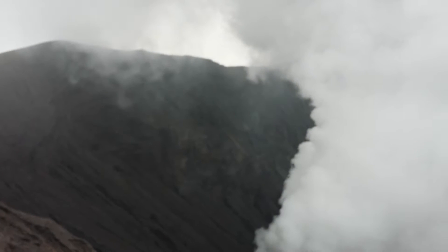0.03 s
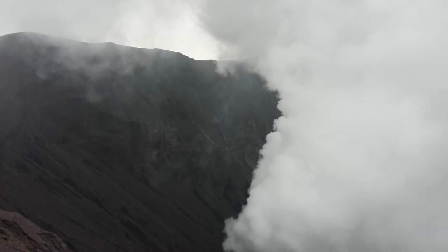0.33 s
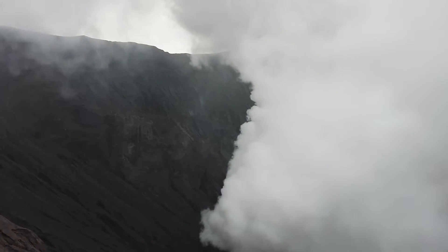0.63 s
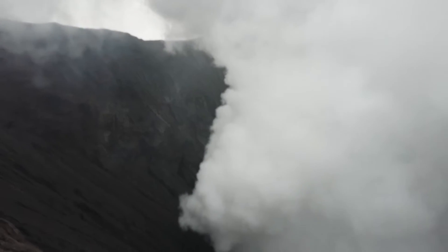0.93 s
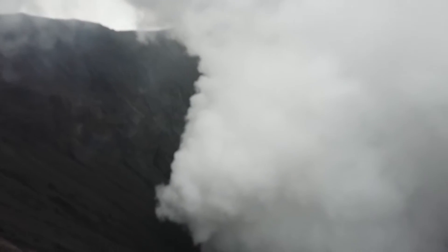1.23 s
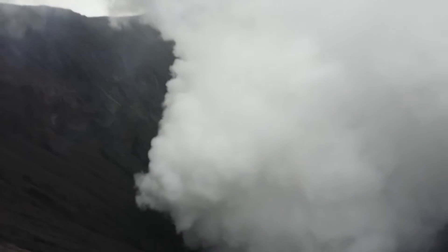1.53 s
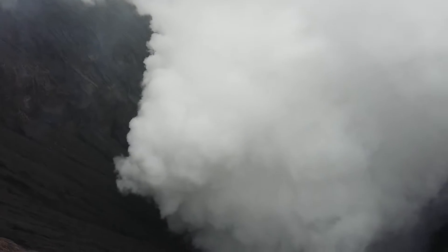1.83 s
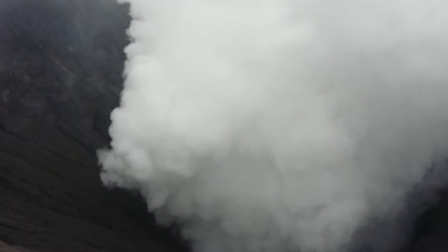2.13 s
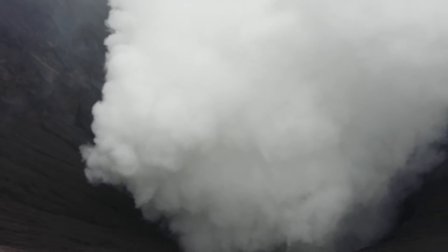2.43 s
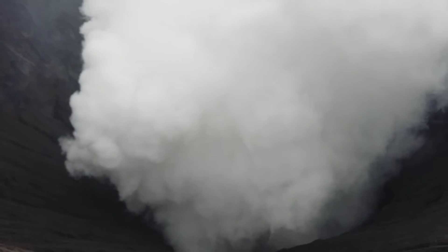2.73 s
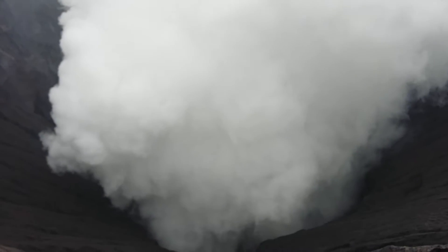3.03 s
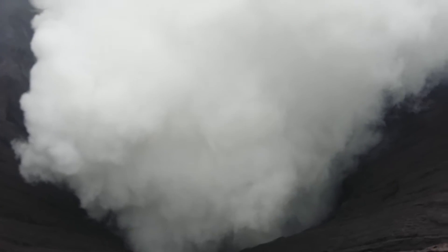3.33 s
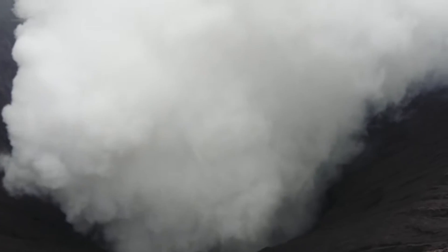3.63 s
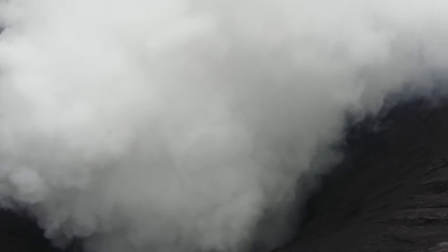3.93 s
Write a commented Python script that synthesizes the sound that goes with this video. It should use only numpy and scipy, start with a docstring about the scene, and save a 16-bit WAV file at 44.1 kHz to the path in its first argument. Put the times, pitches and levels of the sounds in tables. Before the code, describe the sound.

A volcanic vent pours out steam in a steady, low roar topped by a soft hiss. The sound drifts from slightly right to centre and gives two small spurts past the middle, while a faint breeze touches the microphone.

```python
"""On the rim of a volcanic crater, above a vent that pours out steam and gas without pause.
Large eddies rumble and roar, smaller ones rush and hiss, and the jet spurts twice; the crater walls
scatter the treble. The vent's hollow and its narrow throat resonate, wandering in pitch.
The microphone pair stands in a light breeze and turns slowly toward the vent, which brings the
sound from the right to the centre and shifts its colour."""
import sys
import numpy as np
from scipy import signal
from scipy.fft import rfft, irfft
from scipy.io import wavfile
from scipy.ndimage import map_coordinates

SR = 44100
rng = np.random.default_rng(int(sys.argv[2]) if len(sys.argv) > 2 else 0)


def generate_wav(sig):
    """Save sig (samples, or channels by samples) to the path in sys.argv[1] as 16-bit PCM at SR."""
    pcm = np.round(np.clip(np.atleast_2d(sig).T, -1, 1) * 32767).astype(np.int16)
    wavfile.write(sys.argv[1], SR, pcm)


N = 176400
TIME = np.arange(N) / SR
BIN_HZ = np.maximum(np.arange(N // 2 + 1) * SR / N, 1)
SIDES = np.array([[1], [-1]])  # left, right


def from_db(db):
    """Decibels to gain."""
    return 10 ** (np.asarray(db) / 20)


def in_time(rows):
    """A (time, value) curve at every sample."""
    return np.interp(TIME, *np.transpose(rows))


def by_hz(rows, octaves=0):
    """A (frequency, value) curve at every bin, on a log axis, slid up by some octaves."""
    hz, value = np.transpose(rows)
    return np.interp(np.log2(BIN_HZ) - octaves, np.log2(hz), value)


def bell(hz, octaves):
    """Bell-shaped gain around a frequency."""
    return np.exp(-.5 * (np.log2(BIN_HZ / hz) / octaves) ** 2)


def rms_one(x):
    """Scale to unit rms."""
    return x / np.sqrt(np.mean(x ** 2) + 1e-20)


def white():
    """Spectrum of white noise at 0 dB per Hz."""
    return rfft(rng.standard_normal(N)) * np.sqrt(SR / 2)


def drift(rate_hz):
    """Slow random wander of unit rms."""
    return rms_one(irfft(white() / (1 + (BIN_HZ / rate_hz) ** 2), N))


def jet():
    """Eddies from large to small: each size swells and flutters by itself, and all billow together."""
    # base spectrum of the jet at the rim: (frequency [Hz], level [dB per Hz])
    jet_spectrum = [(20, -79), (31, -77), (40, -68), (49, -59.5), (64, -50), (85, -49), (125, -41.5),
                    (160, -43), (182, -45), (215, -44), (278, -45.5), (345, -52), (385, -50), (450, -53.5),
                    (500, -60.5), (600, -57), (800, -60.5), (1000, -58.5), (1220, -58), (1500, -57),
                    (1850, -59.5), (2120, -60), (2500, -64), (3000, -68), (3500, -66.5), (3980, -68.5),
                    (4400, -77), (5000, -88.5), (6000, -98.5), (7000, -108), (8000, -124), (11000, -150)]
    # slow swell of each band, low to high: (time [s], gain [dB])
    rumble = [(0, 1.5), (.3, 0.6), (.8, 1), (1.15, -0.3), (1.401, -0.4), (1.68, -1.5), (1.79, 4.5),
              (1.92, -2.3), (2.4, -1), (2.8, -0.5), (3.2, 0.3), (4, -1)]
    roar = [(0, -1.5), (.35, -0.5), (.7, -4), (.92, -2), (1.449, 0.6), (1.899, 1), (2.3, 1.2), (2.6, 2),
            (2.9, 2.5), (3.1, 0), (4, 0)]
    drone = [(0, -1.5), (.3, 4), (.55, -1), (.85, 3), (1.3, 0), (1.8, -1), (2.199, 0.5), (2.8, -1),
             (3.25, -4.5), (3.6, -0.5), (4, -2.5)]
    low_rush = [(0, 3.5), (.5, 2), (.9, 0.7), (1.2, 4.5), (1.38, -1.5), (1.65, 4), (2, 2.2), (2.4, 0.9),
                (2.7, -1.4), (3.1, -0.5), (4, -3.8)]
    high_rush = [(0, 0.72), (.4, -0.68), (1.4, 0.11), (1.7, 1), (2.1, 0.48), (2.3, -0.58), (2.65, -0.39),
                 (2.9, -0.93), (3.05, -0.88), (4, -1.8)]
    sizzle = [(0, 1.3), (.4, 0.9), (.8, 1.5), (1.4, -0.5), (1.8, 1.6), (2.2, 0), (2.55, 0.8), (2.85, -0.1),
              (3.05, -2), (3.5, -1.5), (4, -3)]
    hiss = [(0, -5.5), (1, -1.4), (1.75, 1.6), (2.2, 1.9), (2.9, 1), (3.25, 2), (3.6, 1.1), (4, 1)]
    top_hiss = [(0, 8), (0.799, 4.5), (1.599, 4), (2.2, 0), (3.2, 0.5), (4, -1.5)]
    # where neighbouring bands meet: (frequency [Hz])
    crossovers = [185, 490, 690, 1020, 1700, 2900, 4450]
    # restlessness of each band: (level spread [dB])
    flutters = [1, 0.53, 0.47, 0.98, 1, .5, 0.35, .4]
    swells = (rumble, roar, drone, low_rush, high_rush, sizzle, hiss, top_hiss)
    lowpasses = [1 / (1 + (BIN_HZ / hz) ** 16) for hz in crossovers] + [1]
    remaining = turbulence() * from_db(by_hz(jet_spectrum))
    billow_db = 0.56 * drift(rate_hz=4)
    out = 0
    for lowpass, swell, flutter_db in zip(lowpasses, swells, flutters):
        band = irfft(remaining * lowpass, N)
        gain_db = in_time(swell) + billow_db + flutter_db * drift(rate_hz=12)
        out = out + band * from_db(gain_db)
        remaining = remaining * (1 - lowpass)
    return out


def turbulence():
    """Stereo noise spectrum: direct sound is common to both microphones, wall scatter differs."""
    # sound reaching the rim straight from the vent: (frequency [Hz], share [0-1])
    direct_share = [(40, 0.8), (85, 1), (170, 0.98), (300, 0.98), (410, 0.97), (490, .85), (590, .95),
                    (850, 0.81), (1250, .93), (1480, 0.8), (1720, .66), (2100, .82), (2700, .61),
                    (3350, .68), (4200, 0.2), (6000, 0)]
    direct = np.clip(by_hz(direct_share), 0, .999)
    mid = np.sqrt((1 + direct) / 2) * white()
    side = np.sqrt((1 - direct) / 2) * white()
    return mid + SIDES * side


def spurts():
    """Short rounded surges of gas that brighten the rush."""
    # the two surges: (time [s], length [s], level at the crest [dB])
    surges = [(2.523, 0.08, -25.5), (2.79, 0.17, -27.5)]
    swell = sum(from_db(db) * np.exp(-2 * ((TIME - at) / length) ** 2) for at, length, db in surges)
    return swell * rms_one(irfft(turbulence() * bell(hz=1370, octaves=0.35), N))


def resonance(rows, width_hz):
    """A cavity blown by the jet: a narrow band of noise whose centre wanders."""
    times, centre_hz, level_db = np.transpose(rows)
    phase = 2 * np.pi * np.cumsum(np.interp(TIME, times, centre_hz)) / SR
    lowpass = 1 / np.sqrt(1 + (2 * BIN_HZ / width_hz) ** 4)
    in_phase, quadrature = (irfft(white() * lowpass, N) for _ in range(2))
    band = rms_one(in_phase * np.cos(phase) + quadrature * np.sin(phase))
    return from_db(np.interp(TIME, times, level_db)) * band


def vent_resonances():
    """The vent's hollow booms, its narrow throat rings, and a breathy resonance sits above them."""
    # path of each resonance: (time [s], centre [Hz], level [dB])
    hollow = [(0, 140, -22.5), (.25, 165, -27.5), (.55, 170, -28), (.72, 195.1, -29), (.96, 195, -21),
              (1.3, 205, -28), (1.6, 220, -33), (2.0, 218, -25.5), (2.3, 216, -20.5), (2.55, 218, -23.5),
              (2.8, 256, -25), (3.05, 240, -34.5), (3.5, 225, -31.5), (4, 205, -29)]
    throat = [(0, 1192, -39.5), (.8, 1202, -33.5), (1.3, 1214, -34.5), (1.55, 1096, -32.5),
              (1.8, 1177, -33), (2.2, 1170, -34.5), (2.55, 1265, -39), (2.8, 1290, -33),
              (3.05, 1237, -39.5), (4, 1224, -40.5)]
    shrill = [(0, 2345, -54), (.62, 2400, -43.5), (1.2, 2349, -42.5), (1.9, 2257, -43.5), (2.4, 2168, -43),
              (2.85, 2105, -41.5), (4, 2154, -43.5)]
    return (resonance(hollow, width_hz=60) + resonance(throat, width_hz=170)
            + resonance(shrill, width_hz=310))


def microphone_ports(sound):
    """Each port colours the sound; the colour slides and changes depth as the pair turns."""
    # base colour of the ports: (frequency [Hz], left minus right [dB])
    balance = [(50, -0.5), (150, -0.6), (290, -1), (470, 0.5), (540, -1.5), (650, -3.5), (770, -4.5),
               (1000, -2.5), (1350, -1), (1740, 5), (2070, -2.5), (2450, 3.5), (2780, 8), (3150, -2.5),
               (3550, -8), (4150, -10), (4700, -2.5), (5200, 5), (6500, 2), (8000, 8.5)]
    # phase between the ports: (frequency [Hz], left lead [rad])
    port_phase = [(100, 0), (250, .1), (380, .1), (540, -0.46), (720, 0.094), (1000, 0.46), (1550, 0.32),
                  (1920, -0.91), (2300, 0.64), (2650, -0.39), (3100, -1.64), (3800, -1)]
    # the colour through the turn: (time [s], slide [octaves], depth [factor])
    turn = [(0, -0.072, 0.74), (1, -0.056, 0.84), (2, 0.026, 1.18), (3, 0.047, 1.05), (4, .13, 0.9)]
    times = [row[0] for row in turn]
    spectrum, out = rfft(sound), 0
    for (_, octaves, depth), crossfade in zip(turn, np.eye(len(turn))):
        slide = octaves / (1 + (BIN_HZ / 1800) ** 8)  # the treble's colour stays in place
        gain = from_db(SIDES * depth * by_hz(balance, slide) / 2)
        gain /= np.sqrt(np.mean(gain ** 2, axis=0))  # the pair's total power holds steady
        colour = gain * np.exp(.5j * SIDES * by_hz(port_phase, slide))
        out = out + np.interp(TIME, times, crossfade) * irfft(spectrum * colour, N)
    return out


def arrival_lag(sound):
    """The vent reaches the left microphone late; the gap closes as the pair turns to face it."""
    # left microphone behind the right: (time [s], lag [ms])
    left_lag = [(0, 0.21), (.7, 0.16), (1.2, 0.13), (1.7, 0.085), (2.3, 0.068), (3, 0.03), (4, -0.026)]
    left, right = sound
    lag_samples = in_time(left_lag) * SR / 1000
    late_left = map_coordinates(left, [np.arange(N) - lag_samples], order=5, mode="mirror")
    return np.array([late_left, right])


def breeze():
    """Lumpy low buffeting right on the microphones, different at each port."""
    # slow trend of the buffeting: (time [s], level [dB])
    trend = [(0, -40), (.6, -44), (.9, -47), (1.7, -46.5), (2.15, -41), (2.6, -45), (3.3, -39), (4, -30.5)]
    colour, gust_db = bell(hz=73, octaves=.34), 1.4
    channels = []
    for _ in range(2):
        buffet = rms_one(irfft(white() * colour, N))
        channels.append(buffet * from_db(in_time(trend) + gust_db * drift(rate_hz=4)))
    return np.array(channels)


def scene():
    """The vent from the rim, moving from right to centre as the pair turns in a light breeze."""
    vent = vent_resonances() + jet() + spurts()
    return arrival_lag(microphone_ports(vent)) + breeze()


def record(dry):
    """The ends are eased, faint microphone hiss is added and the top is cut."""
    fade_s, hiss_db_per_hz, stopband_hz = .004, -119.5, 17270
    to_edge_s = np.minimum(TIME, TIME[::-1])
    ease = np.sin(np.pi / 2 * np.minimum(to_edge_s / fade_s, 1)) ** 2
    hiss = from_db(hiss_db_per_hz) * irfft(np.array([white(), white()]), N)
    lowpass = signal.cheby2(12, 70, stopband_hz, fs=SR, output="sos")
    return signal.sosfilt(lowpass, dry * ease + hiss)


dry = scene()
out = record(dry)
generate_wav(out)
```